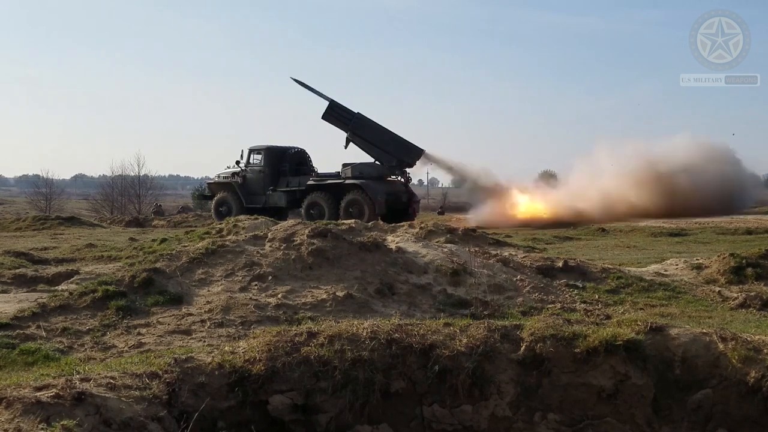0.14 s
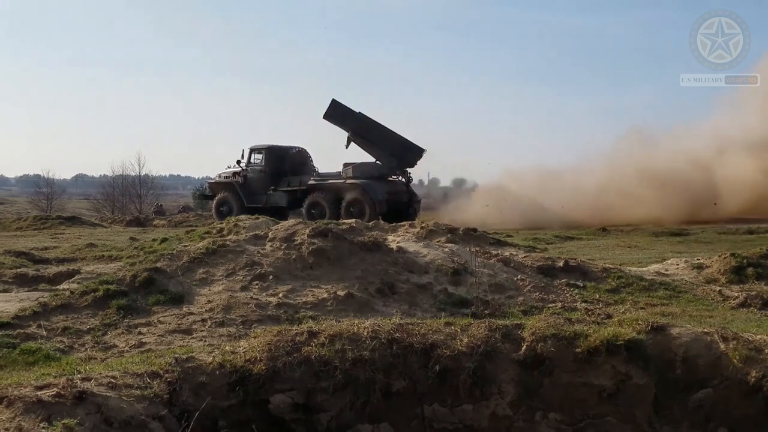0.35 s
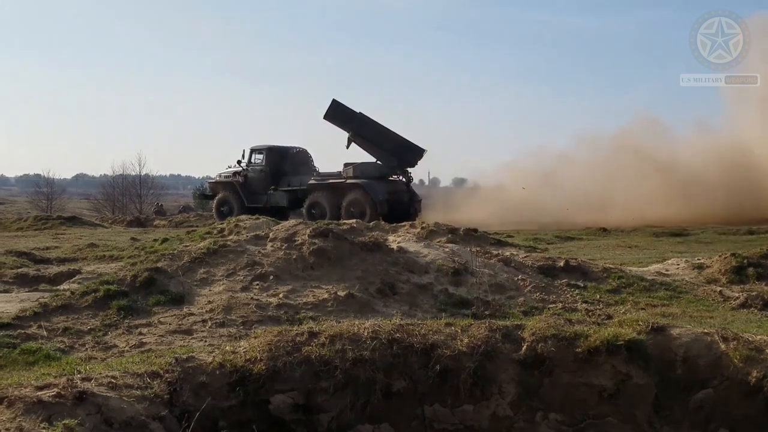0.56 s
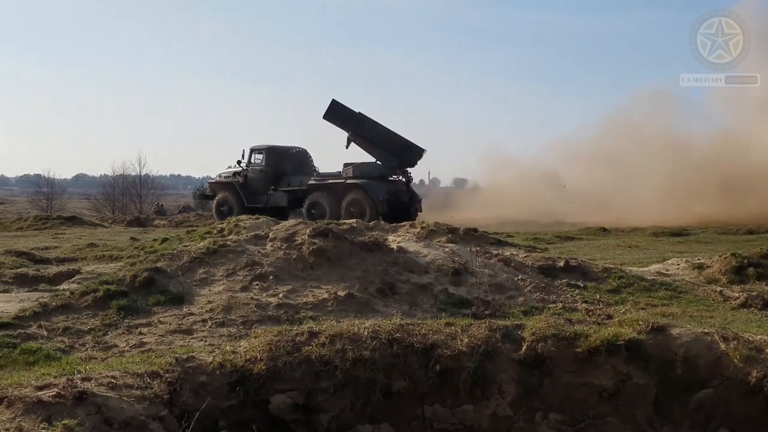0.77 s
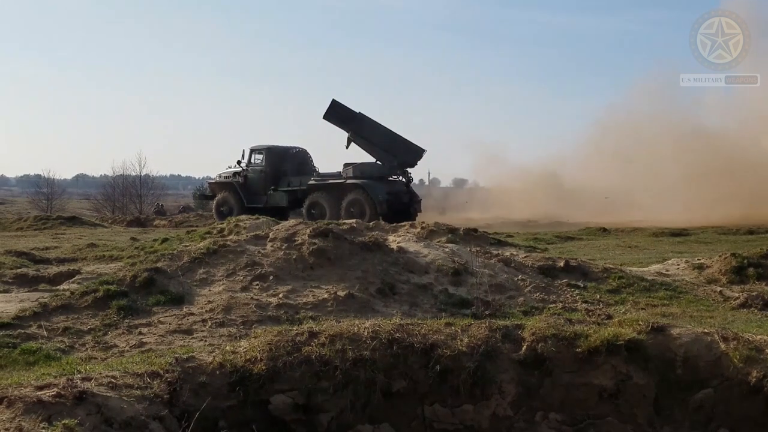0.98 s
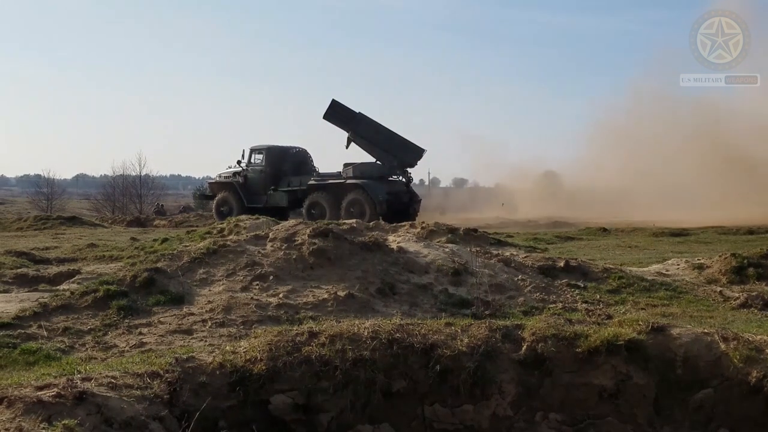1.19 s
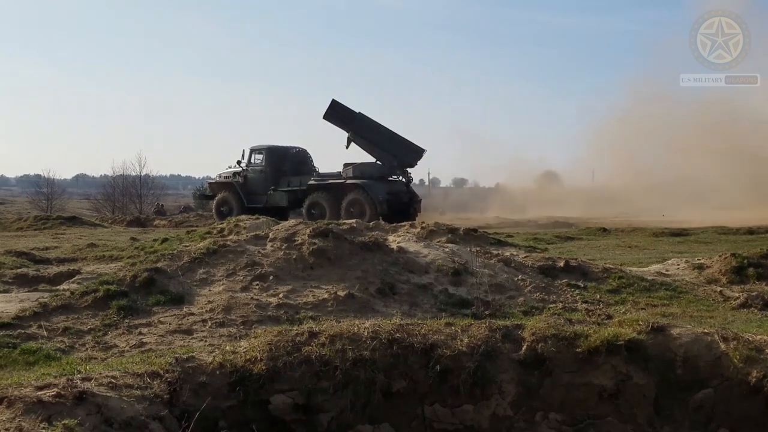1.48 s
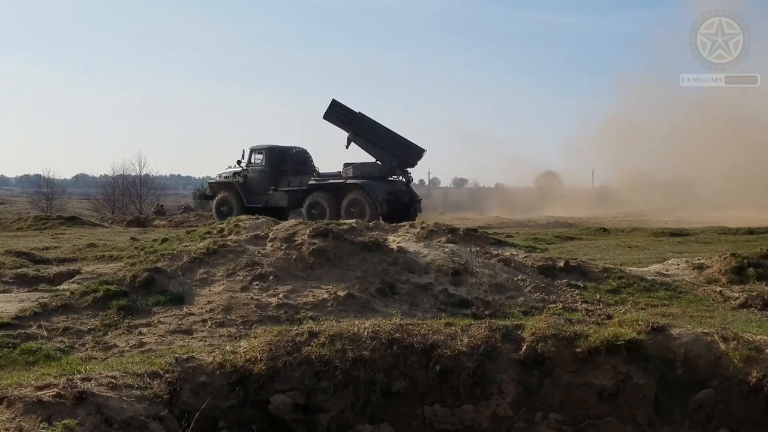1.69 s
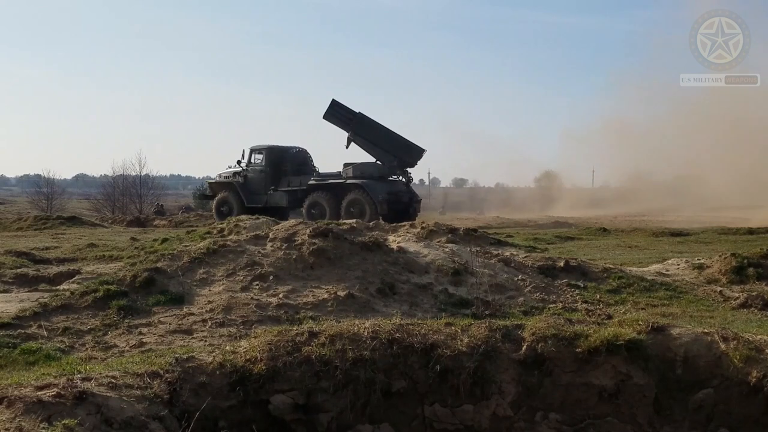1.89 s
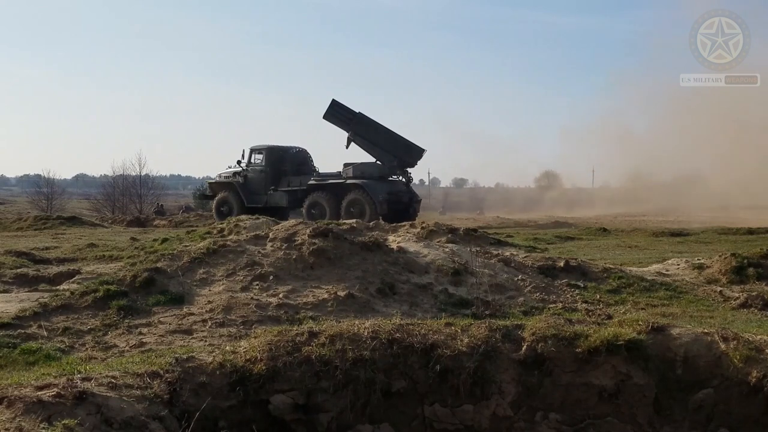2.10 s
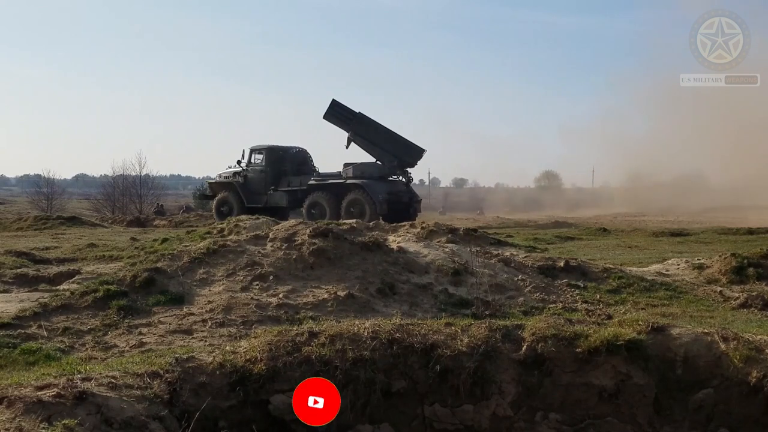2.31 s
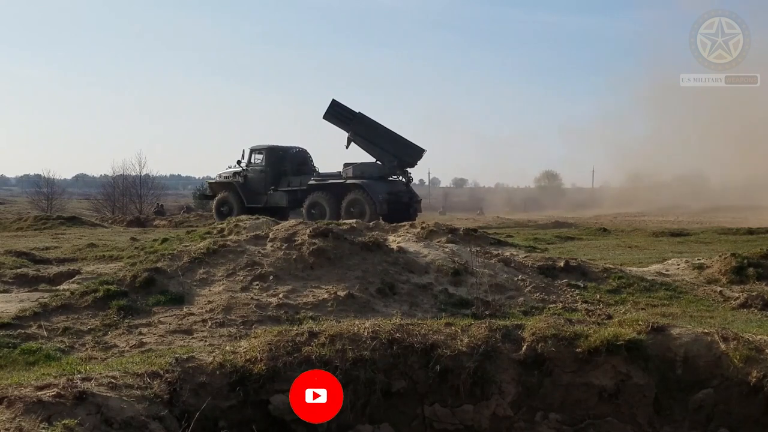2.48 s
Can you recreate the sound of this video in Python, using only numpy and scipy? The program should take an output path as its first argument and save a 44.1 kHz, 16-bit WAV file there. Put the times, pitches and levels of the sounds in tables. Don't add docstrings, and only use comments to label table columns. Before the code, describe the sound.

Single rocket launch outdoors, heard by an overloaded stereo recorder: quiet air, a hard bang and thump, loud tearing exhaust noise sinking in pitch, then muffled distant roar, sparse cracks and rolling low rumble.

```python
import sys
import numpy as np
from scipy import signal
from scipy.fft import rfft, irfft
from scipy.io import wavfile
from scipy.ndimage import uniform_filter1d, map_coordinates

SR = 44100
rng = np.random.default_rng(int(sys.argv[2]) if len(sys.argv) > 2 else 0)


def ratio(d):
    e = np.asarray(d, float) / 20
    return 10 ** e


def to_wav(sig):
    pcm = np.clip(np.atleast_2d(sig), -1, 1) * 32767
    pcm = np.round(pcm).astype(np.int16)
    wavfile.write(sys.argv[1], SR, pcm.T)


N = 116865

# time_s, level_db, plateau_upper_edge_hz, air_path_m
FLIGHT = [(.197, -83, 2200, 60), (.2062, -36, 2200, 40), (.2072, -8.5, 2290, 45), (.238, -13.5, 2250, 55),
          (.244, -17.5, 2240, 44), (.38, -19, 2050, 23), (.46, -19, 1510, 20), (.56, -17, 1070, 30),
          (.68, -15, 680, 52), (.86, -15.5, 820, 74), (.95, -17, 690, 160), (1.06, -19.5, 570, 166),
          (1.3, -22.5, 438, 270), (1.54, -24, 430, 260), (1.64, -22, 376, 490), (1.82, -21.5, 430, 325),
          (1.93, -24, 416, 484), (2.24, -28, 414.6, 494), (2.65, -25, 430, 565)]
# start_s, peak_db
SHOCKS = [(1.23, -40), (1.249, -34), (1.402, -39), (1.455, -42), (1.464, -35), (1.472, -41), (1.48, -39),
          (1.49, -37), (1.5115, -33), (1.53, -43), (1.549, -43), (1.5615, -39), (1.575, -43), (1.802, -44),
          (1.821, -40)]
# start_s, peak_db, length_ms
THUMPS = [
    (.2278, -2, 3.0),
    (.208, -19, 36),
    (.2085, -9, 2.8),
    (.278, -29, 8),
    (.32, -24, 5),
    (.9, -25, 18),
    (.98, -25, 16),
    (1.06, -27, 16),
    (1.49, -16, 30),
    (1.67, -24, 18),
]
# freq_hz, gain_db
MIC_RESPONSE = [(30, -10.5), (115, -2.5), (400, 1), (1200, 3), (2300, 1), (4500, -2), (9300, -6),
                (13000, 1)]
# freq_hz, gain_db
LEFT_MINUS_RIGHT = [(100, .5), (600, -1), (5000, -.7), (14000, .6)]
# freq_hz, level_db
FIELD_SPECTRUM = [(30, 16), (90, 3), (300, -4), (700, -9), (2000, -30), (6000, -40), (16000, -60)]

FIELD_DB = -69
RISE_DB_OCT, FALL_DB_OCT, KNEE = 7, 5.5, 2.52
LOW_EDGE_HZ, LOW_EDGE_SAG_HZ_S = 343, 124
BASS_CUT_HZ = 95
RIDGE_HZ, RIDGE_DB, RIDGE_OCT = 385, 4.5, .4
HOWL_DB, HOWL_OCT, HOWL_FADE_S = 4.5, .3, .7
AIR_DB_PER_M, AIR_POWER = .036, 1.18
SWELL_DB, FLUTTER_DB, SHIMMER_DB = .4, 1.2, 2.2
CRACKLE_PER_S, CRACKLE_DB, CRACKLE_SPREAD_DB, CRACKLE_PATH = 900, -18, 3, .9
GROUND_DB, GROUND_MS = -24.5, 2.398
SCATTER_DB, SCATTER_FADE_DB_S, SCATTER_TILT_DB_OCT = 2, 2.8, .3
LEAD_MS, LEAD_DRIFT_MS_S, TURN_S, TURN_WIDTH_S = .43, .015, .5, .07
RUMBLE_HZ, RUMBLE_DB, RUMBLE_FULL_S, RUMBLE_RISE_DB_S, RUMBLE_SWELL_DB = 138, -26, 1.71, 12.5, 2.5
RUMBLE_ARRIVES_S, RUMBLE_EARLY_DB = .97, -12
SHOCK_PATH, SHOCK_TAIL_MS, SHOCK_BOOST_DB = .63, 1, 34.5
CLIP, CLIP_KNEE = .44, 4
TOP_HZ = 15300
FRAME, HOP = 2048, 256


def on_log(hz, table):
    table = np.array(table, float)
    return np.interp(np.log(hz + 1), np.log(table[:, 0] + 1), table[:, 1])


def colour(x, db):
    hz = np.arange(N + 1) * SR / (2 * N)
    return irfft(rfft(x, 2 * N) * ratio(db(hz)), 2 * N)[..., :N]


def flight(t, column):
    table = np.array(FLIGHT)
    return np.interp(t, table[:, 0], table[:, column])


def late(x, ms):
    return map_coordinates(x, [np.arange(N) - ms * SR / 1000], mode="mirror")


def walk(rate_hz, count):
    hold = max(int(SR / rate_hz / HOP), 1)
    levels = np.repeat(rng.standard_normal((count, 500)), hold, axis=1)[:, :500]
    levels = uniform_filter1d(levels, hold + 1)
    levels = uniform_filter1d(levels, hold + 1)
    return levels / levels.std()


def ripple(rate_hz, per_octave):
    hz = np.arange(FRAME // 2 + 1) * SR / FRAME
    place = per_octave * np.log2(1 + hz / 40)
    bands = walk(rate_hz, 11 * per_octave)
    low = place.astype(int)
    return bands[low] + (bands[low + 1] - bands[low]) * (place - low)[:, None]


def quiet_field():
    noise = rng.standard_normal(N) + .5 * rng.standard_normal((2, N))
    field = colour(noise, lambda hz: on_log(hz, FIELD_SPECTRUM))
    return field * ratio(FIELD_DB) / field.std()


def turbulence():
    swell = SWELL_DB * walk(5.04, count=1)
    flutter = FLUTTER_DB * ripple(20, per_octave=1)
    shimmer = SHIMMER_DB * ripple(14, per_octave=12)
    return swell + flutter + shimmer


def jet_spectrum_db(hz, t):
    upper_hz = flight(t, column=2)
    lower_hz = LOW_EDGE_HZ - LOW_EDGE_SAG_HZ_S * t
    rise = -RISE_DB_OCT / KNEE * np.log2(1 + (lower_hz / hz) ** KNEE)
    fall = -FALL_DB_OCT / KNEE * np.log2(1 + (hz / upper_hz) ** KNEE)
    ridge = RIDGE_DB * np.exp(-(np.log2(hz / RIDGE_HZ) / RIDGE_OCT) ** 2)
    howl = HOWL_DB * np.exp(-(np.log2(hz / upper_hz) / HOWL_OCT) ** 2 - (t / HOWL_FADE_S) ** 2)
    bass_cut = -20 * np.log10(1 + (BASS_CUT_HZ / hz) ** 3)
    return rise + fall + ridge + howl + bass_cut


def travel(x, path, eddies_db):
    hz, t, bins = signal.stft(x, SR, nperseg=FRAME, noverlap=FRAME - HOP)
    hz = hz[:, None] + 2
    jet = jet_spectrum_db(hz, t)
    air = AIR_DB_PER_M * (hz / 4000) ** AIR_POWER * flight(t, column=3)
    norm = np.sqrt(np.mean(ratio(jet - air) ** 2, axis=0))
    gain = ratio(jet - path * air + eddies_db[:, :len(t)]) / norm
    return signal.istft(bins * gain, SR, nperseg=FRAME, noverlap=FRAME - HOP)[1][:N]


def crackle():
    occurs, size = rng.random((N, 2)).T
    fronts = (occurs < CRACKLE_PER_S / SR) * ratio(-CRACKLE_SPREAD_DB * np.log(1 - size))
    return ratio(CRACKLE_DB) * fronts / fronts.std()


def exhaust(eddies_db):
    roar = travel(rng.standard_normal(N), 1, eddies_db)
    return roar + travel(crackle(), CRACKLE_PATH, eddies_db)


def scattered_exhaust(eddies_db):
    pair = np.array([exhaust(eddies_db), exhaust(eddies_db)])
    return colour(pair, lambda hz: -10 * np.log10(1 + (500 / (hz + 1)) ** 2)
                  + SCATTER_TILT_DB_OCT * np.log2((hz + 1) / 1000))


def ground_echo(jet):
    return ratio(GROUND_DB) * late(jet, GROUND_MS)


def thumps(t):
    out = np.zeros(N)
    for start_s, peak_db, length_ms in THUMPS:
        cycles = np.clip(t - start_s, 0, None) * 1000 / length_ms
        out -= ratio(peak_db) * np.sin(2 * np.pi * cycles) * np.exp(-2 * cycles)
    return out


def rumble(t):
    band = colour(rng.standard_normal(N), lambda hz: -9 * np.log2((hz + 1) / RUMBLE_HZ) ** 2)
    heave = np.interp(t, np.arange(500) * HOP / SR, walk(9, count=1)[0])
    db = RUMBLE_DB + RUMBLE_RISE_DB_S * np.minimum(t - RUMBLE_FULL_S, 0)
    db = db + RUMBLE_SWELL_DB * heave
    db = db + RUMBLE_EARLY_DB / (1 + np.exp((t - RUMBLE_ARRIVES_S) / .032))
    launched = t > FLIGHT[2][0]
    return band / band.std() * ratio(db) * launched


def shocks():
    fronts = np.zeros(N)
    for start_s, peak_db in SHOCKS:
        fronts[int(start_s * SR)] = ratio(peak_db + SHOCK_BOOST_DB)
    decay = np.exp(-np.arange(1024) / (SHOCK_TAIL_MS * SR / 1000))
    tail = .2 * rng.standard_normal(1024) * decay
    return np.convolve(fronts, np.r_[1, tail])[:N]


def scene():
    t = np.arange(N) / SR
    eddies_db = turbulence()
    level = ratio(flight(t, column=1))
    jet = exhaust(eddies_db) * level + travel(shocks(), SHOCK_PATH, 0 * eddies_db)
    direct = jet + ground_echo(jet) + thumps(t) + rumble(t)
    lag_ms = (LEAD_MS - LEAD_DRIFT_MS_S * t) / (1 + np.exp((TURN_S - t) / TURN_WIDTH_S))
    ports = np.array([direct, late(direct, lag_ms)])
    wide = scattered_exhaust(eddies_db) * level * ratio(SCATTER_DB - SCATTER_FADE_DB_S * t)
    return ports + wide + quiet_field()


def top_cut(x):
    return signal.sosfilt(signal.butter(12, 16320, fs=SR, output="sos"), x)


def record(dry):
    flat = dry / (1 + np.abs(dry / CLIP) ** CLIP_KNEE) ** (1 / CLIP_KNEE)
    side = np.array([[.5], [-.5]])
    x = colour(flat, lambda hz: on_log(hz, MIC_RESPONSE) + side * on_log(hz, LEFT_MINUS_RIGHT)
               - 60 / (1 + np.exp(np.clip((TOP_HZ - hz) / 60, -50, 50))))
    return top_cut(x)


dry = scene()
out = record(dry)
to_wav(out)
```